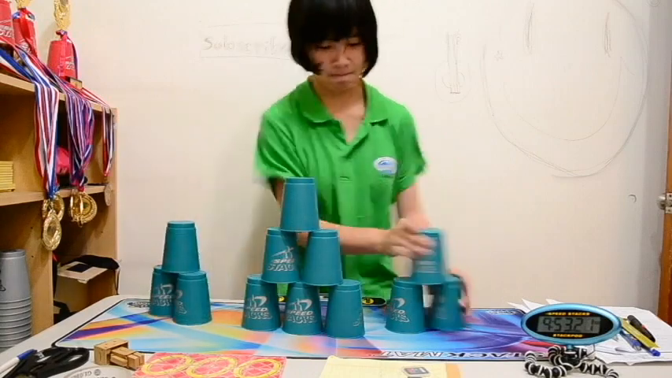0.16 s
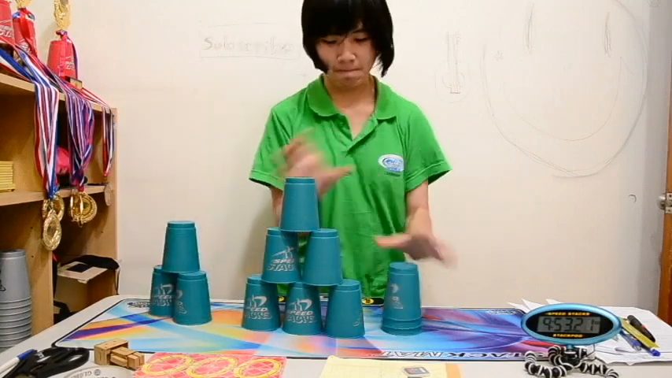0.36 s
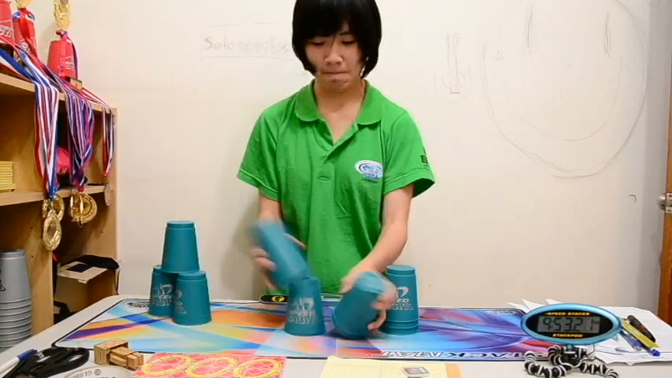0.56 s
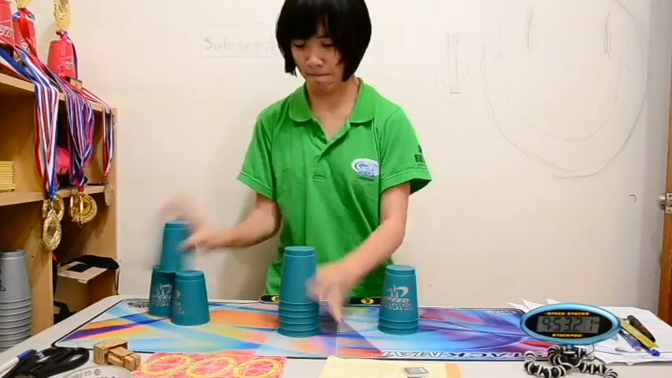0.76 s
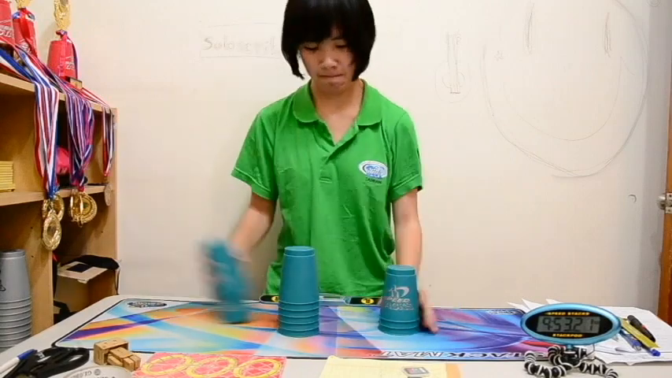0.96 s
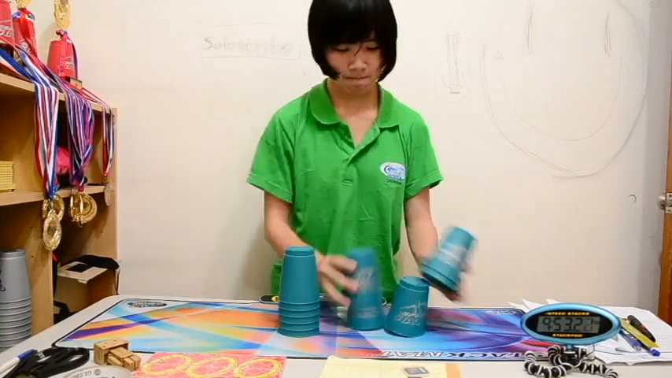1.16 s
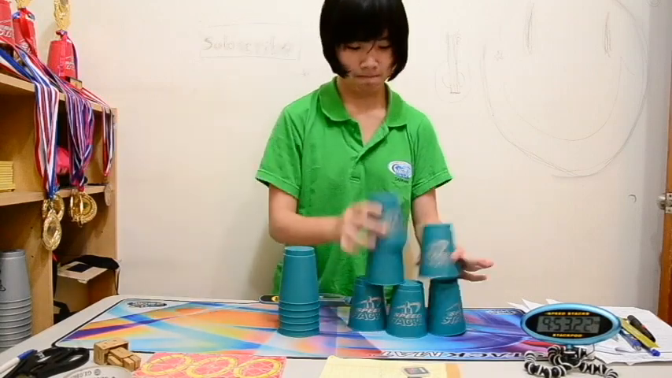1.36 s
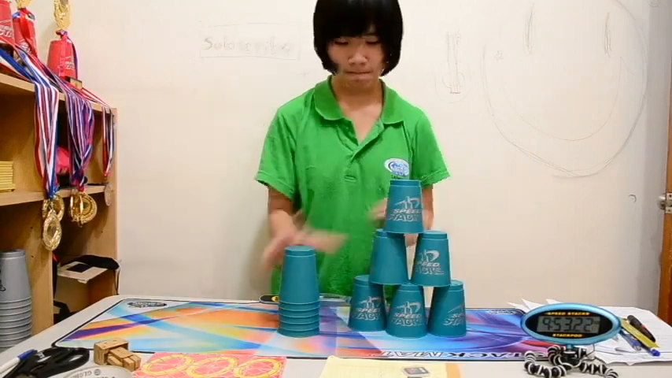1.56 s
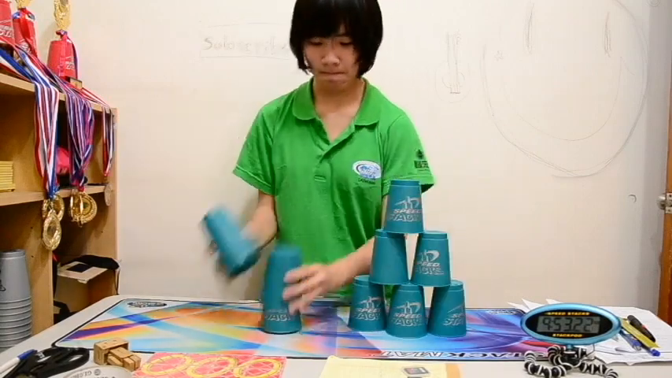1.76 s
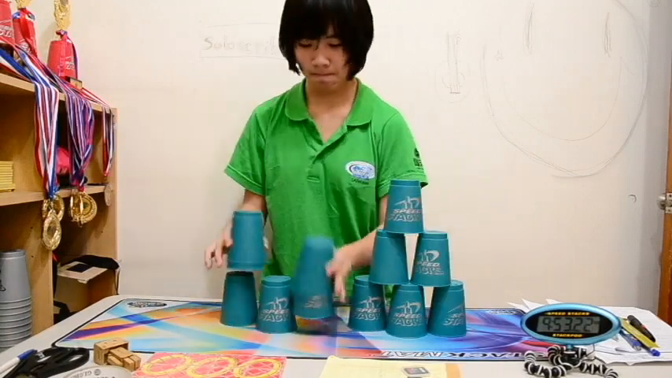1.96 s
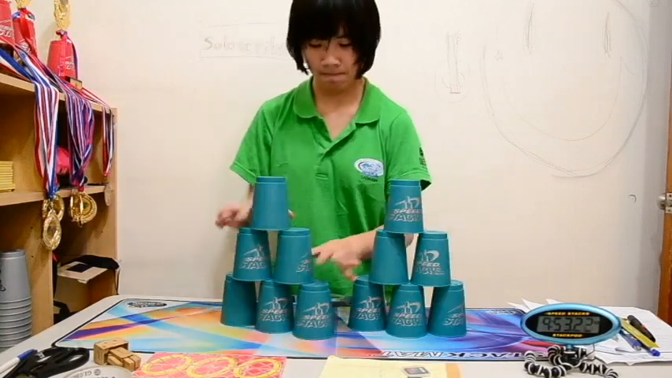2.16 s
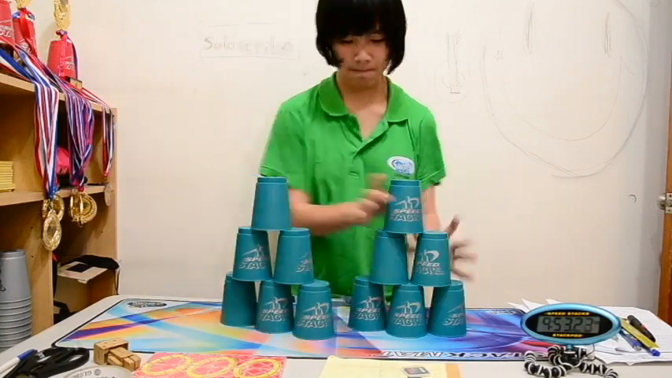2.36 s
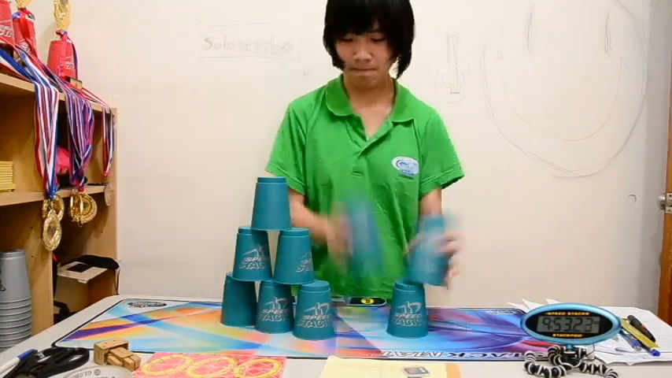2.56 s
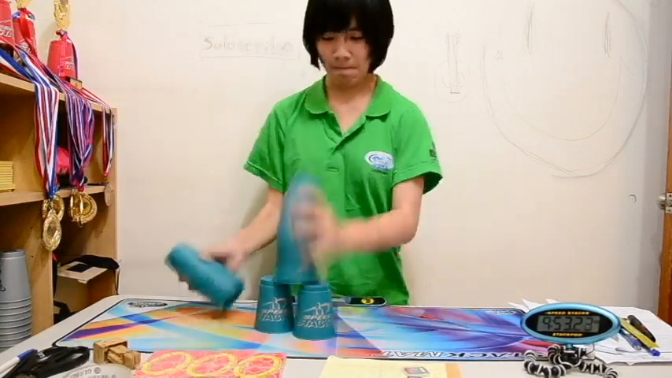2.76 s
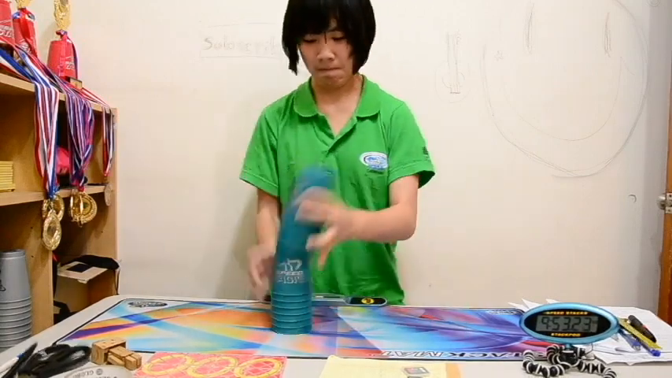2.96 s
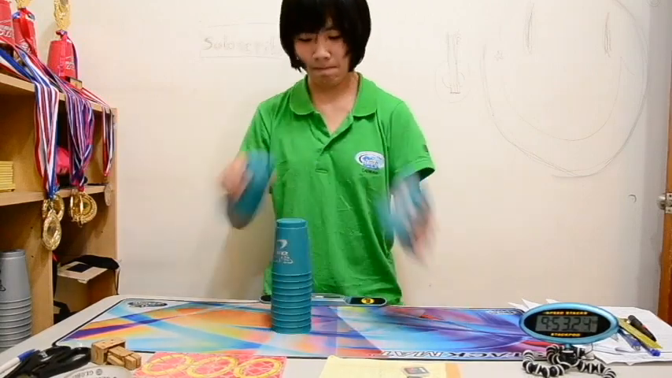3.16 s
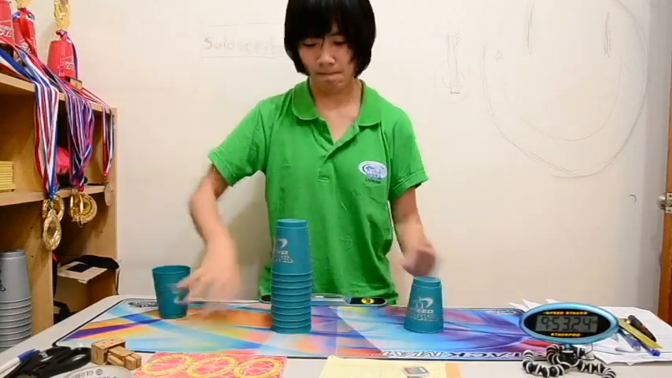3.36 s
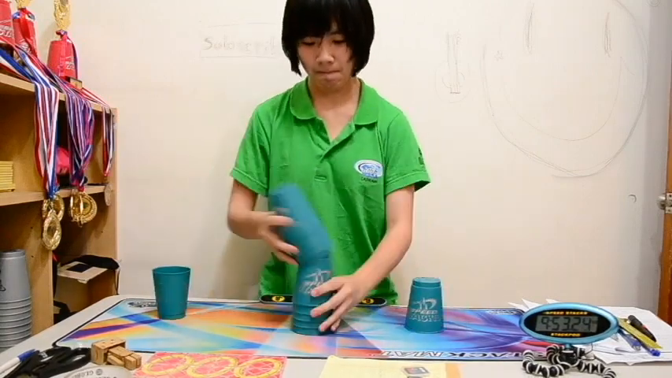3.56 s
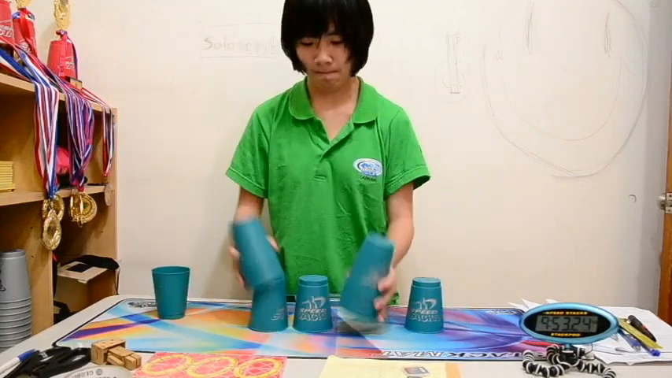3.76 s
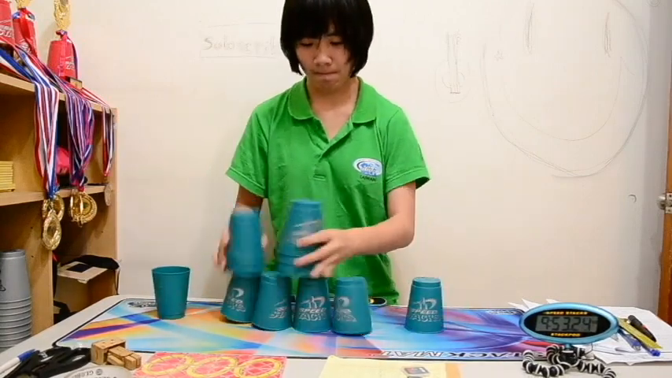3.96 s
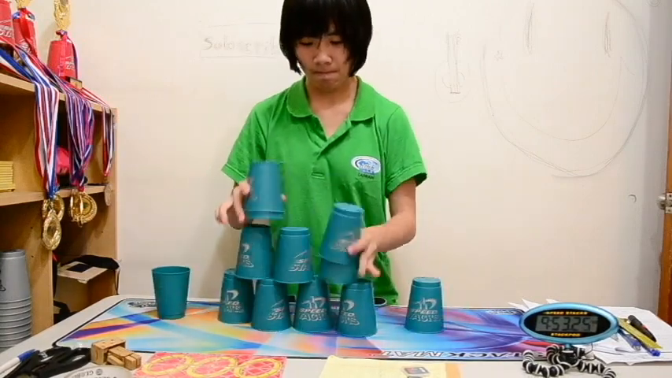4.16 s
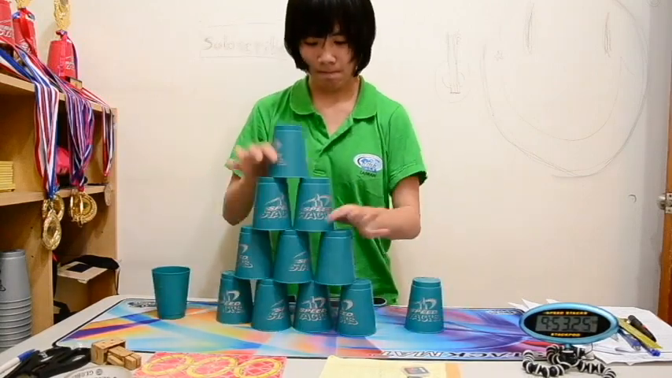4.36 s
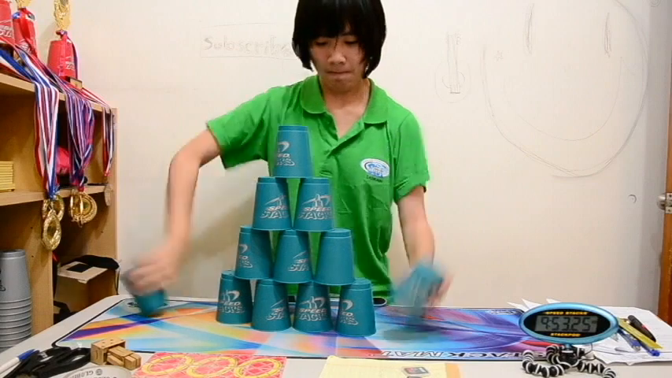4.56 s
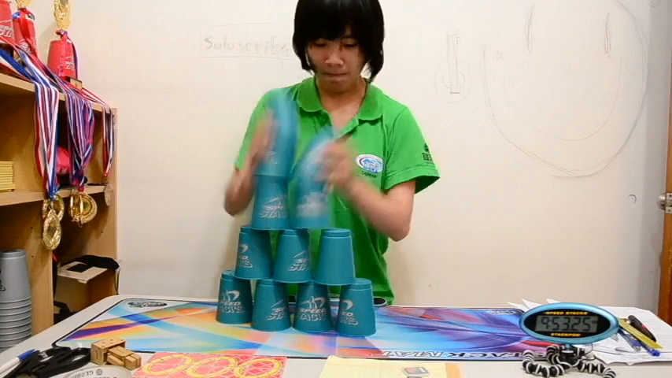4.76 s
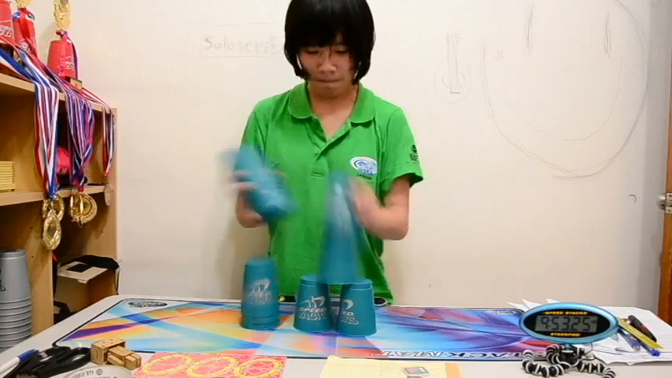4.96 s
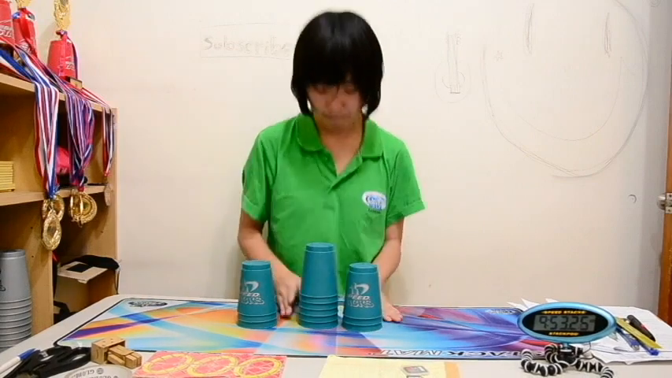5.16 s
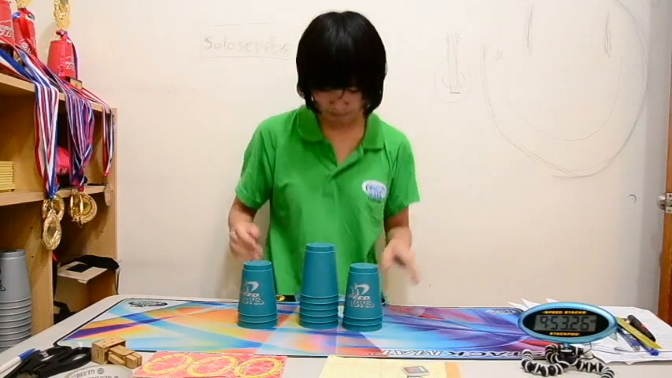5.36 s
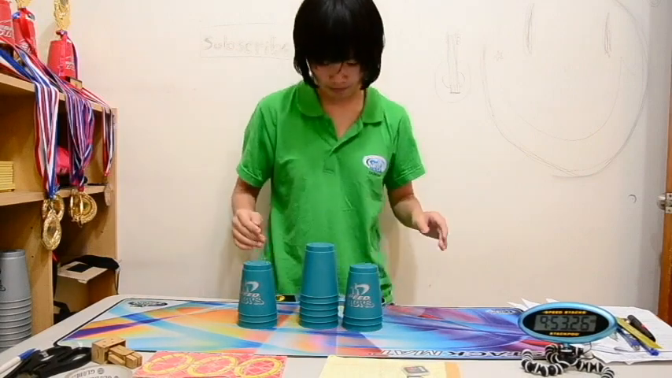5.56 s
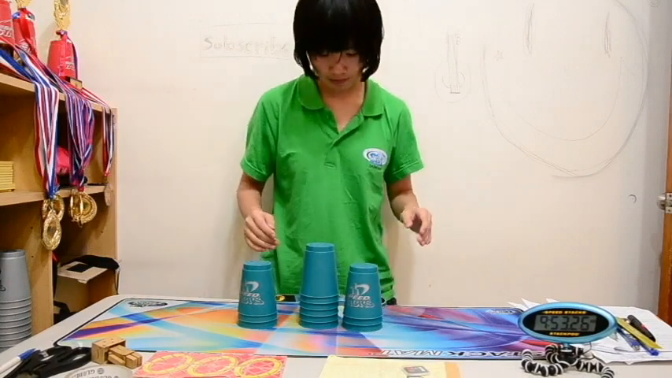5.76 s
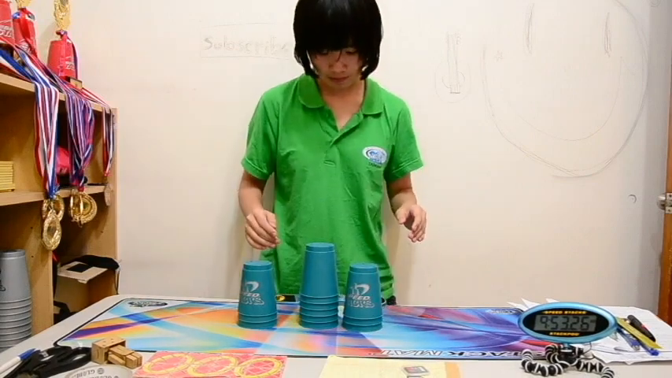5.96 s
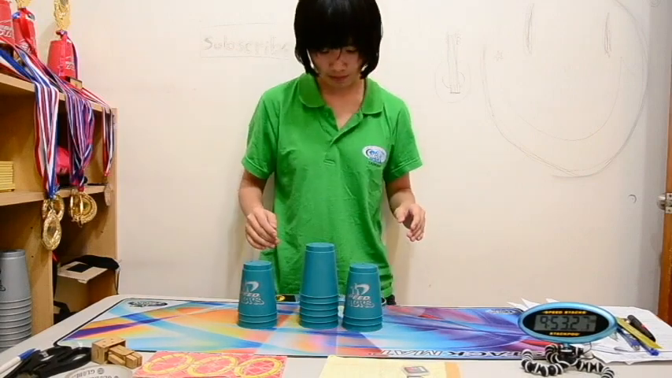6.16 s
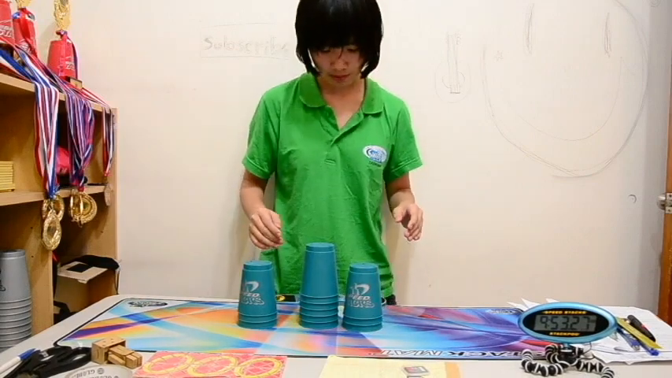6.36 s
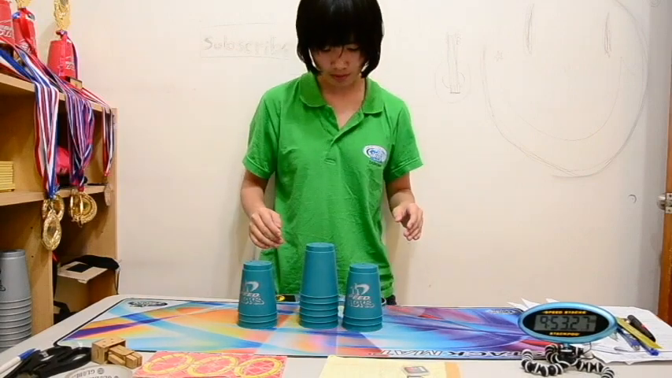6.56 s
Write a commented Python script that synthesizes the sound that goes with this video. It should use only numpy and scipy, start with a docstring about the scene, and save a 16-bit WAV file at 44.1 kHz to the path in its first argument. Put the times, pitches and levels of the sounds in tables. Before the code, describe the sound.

Light plastic cups are handled very fast on a table with a mat, heard from one spot in a small bare room with a short echo. A couple of hollow taps open, then until about 1.1 seconds cups slide into each other with rattles, small pops and loud clacks. From 1.3 to 2.2 seconds come quick runs of hollow taps and knocks as pyramids go up. From 2.4 to 3.1 seconds they are swept down in a dense, sliding clatter. Separate knocks on the mat and light pops follow between 3.3 and 3.8 seconds. Another rapid run of taps grows louder from 3.9 to 4.4 seconds. After a few softer knocks, the last collapse rattles and clacks from 4.8 seconds, ending with knocks at around 5.2. A very faint high ring accompanies the clatter. Only a soft room hush remains until the end, around 6.5 seconds.

```python
"""In a small bare room, light plastic cups are stacked fast into pyramids on a table with a mat,
then swept down into piles. Each hit thumps the table, knocks on the mat, rings the air in the cup
and its thin wall, and clicks at the rim. Cups rattle and pop as they slide into each other.
The room echoes over a soft hush, something rings faintly along, and the loudest peaks are squashed."""
import sys
import numpy as np
from scipy import signal
from scipy.fft import rfft, irfft, next_fast_len
from scipy.io import wavfile
from scipy.ndimage import uniform_filter1d

SR = 44100
rng = np.random.default_rng(int(sys.argv[2]) if len(sys.argv) > 2 else 0)


def store_pcm(level_fs):
    """Save levels as 16-bit WAV."""
    pcm = np.round(np.clip(level_fs, -1, 1) * 32767).astype(np.int16)
    wavfile.write(sys.argv[1], SR, np.atleast_2d(pcm).T)


N = 291041
HIT_TIME = np.arange(SR // 8) / SR  # seconds since a hit; every fade_s is the time to fall by 60 dB
FIRM_DB = -18.5  # a hit this strong has its usual snap; stronger ones sound cleaner


def amp(db):
    """Turn decibels into a number to multiply by."""
    return 10 ** (np.asarray(db) / 20)


def unit(x):
    """Scale a sound to an average strength (rms) of 1."""
    return x / np.sqrt(np.mean(x ** 2) + 1e-20)


def add(track, start_s, sound):
    """Mix a sound into the track."""
    start = max(round(start_s * SR), 0)
    track[start:start + len(sound)] += sound[:len(track) - start]


def along(points, hz):
    """Read between the rows of a (pitch_hz, value) table."""
    pitches, values = np.transpose(points)
    return np.interp(np.log(hz + 1), np.log(pitches + 1), values)


def causal(gain):
    """A filter with these gains that never sounds before it is hit (minimum phase)."""
    cepstrum = irfft(np.log(gain))
    half = len(gain) - 1
    cepstrum[1:half] *= 2
    cepstrum[half + 1:] = 0
    return np.exp(rfft(cepstrum))


def coloured(x, spectrum):
    """Shape a sound's lows and highs with a (pitch_hz, level_db) table."""
    hz = np.fft.rfftfreq(2048, 1 / SR)
    response = irfft(causal(amp(along(spectrum, hz))))
    return signal.fftconvolve(x, response)[:len(x)]


def ring(tones, detune, scatter_db, swell_s):
    """The fading tones of a struck thing; every hit tunes and weights them a little differently."""
    hz, db, fade_s = np.transpose(tones)[:, :, None]
    tuning, strength, side = rng.standard_normal((3, len(tones), 1))
    swing = np.sign(side) * np.sin(2 * np.pi * hz * np.exp(detune * tuning) * HIT_TIME)
    swing *= amp(db + scatter_db * strength - 60 * HIT_TIME / fade_s) * (1 - np.exp(-HIT_TIME / swell_s))
    return np.diff(np.sum(swing / hz, axis=0), prepend=0)  # sound follows the change of motion


def crack(fade_s):
    """So many tones at once that they blur into a burst of noise, even from low to high."""
    burst = rfft(rng.standard_normal(len(HIT_TIME)) * amp(-60 * HIT_TIME / fade_s))
    ripple = np.sqrt(np.abs(uniform_filter1d(np.abs(burst) ** 2, size=24)))
    return irfft(burst * causal(ripple.mean() / ripple), len(HIT_TIME))


# the lows and highs of the quiet room: pitch_hz, level_db
HUSH_COLOUR = [(25, -20), (60, -5), (100, -12), (200, -4), (500, -1.5), (1000, -3), (2000, -8.5),
               (3200, -12.5), (5000, -19.5), (7000, -23), (9500, -35.5), (12000, -45), (16000, -53)]
def room_hush(level_db):
    """The soft, steady noise of the room."""
    return amp(level_db) * unit(coloured(rng.standard_normal(N), HUSH_COLOUR))


# the tones of the table top: pitch_hz, level_db, fade_s
TABLE_TONES = [(66, -36.5, .08), (120, -7.5, 0.075), (189.2, -7.5, .035), (246.5, 5, 0.041),
               (300, 13, 0.025)]
def table_thump():
    """The table top shakes with a low thump."""
    return ring(TABLE_TONES, detune=0.04, scatter_db=-0.5, swell_s=0.0017)


# the tones of a cup pressed on the mat: pitch_hz, level_db, fade_s
KNOCK_TONES = [(395.4, -5.5, 0.019), (450.5, -4, 0.022), (565.5, -3.5, 0.044), (710, 2, 0.027)]
def mat_knock():
    """A cup gives a short knock against the mat."""
    return ring(KNOCK_TONES, detune=0.073, scatter_db=4.0, swell_s=0.0016)


def cup_air(hz, fade_s):
    """The hollow 'pok': air rings in the struck cup, and more weakly in the cups it touches."""
    own = ring([(hz, 0, fade_s)], detune=0.027, scatter_db=-2, swell_s=0.0012)
    neighbour_tones = [(739.0, 2.0, 0.01), (920.5, -6.5, 0.042), (1073.0, -2.5, 0.033)]
    return own + amp(-8) * ring(neighbour_tones, detune=.03, scatter_db=5, swell_s=0.0012)


# the lows and highs of a cup's wall: pitch_hz, level_db
WALL_COLOUR = [(200, -32), (900, -11), (1350, 0.5), (1650, 0), (2150, -1), (2700, -5.5), (3500, -10),
               (5000, -17), (10000, -42.5), (16000, -63.5)]
def cup_wall():
    """The thin wall's many tones die fast, in a dry clack."""
    return coloured(crack(fade_s=.016), WALL_COLOUR)


# a bright click, with the treble near 11 kHz filtered away: pitch_hz, level_db
CLICK_FILTER = [(100, -31), (400, -11.5), (1500, -6), (3500, 0.5), (5200, -0.5), (7000, -1.5), (7800, -7),
                (8600, -2.5), (10000, -7.5), (11300, -29), (14500, -22), (16500, -32.5)]
def rim_click(chatter_db, chatter_fade_s):
    """A sharp crack, then the rim chatters in tiny bounces."""
    bounces = unit(rng.standard_normal(len(HIT_TIME)) ** 5)
    chatter = bounces * amp(chatter_db - 60 * HIT_TIME / chatter_fade_s)
    return coloured(crack(fade_s=.011) + chatter, CLICK_FILTER)


# how long the room's echo lasts: pitch_hz, fade_s
ECHO_FADES = [(100, 0.47), (260, 0.41), (700, 0.29), (1800, 0.34), (4500, 0.32), (9000, 0.27), (15000, 0.2)]
def room_echo(snap_db, wall_db, wall_s, build_s):
    """Sound arrives straight from the cup, then off the wall behind, then from all around."""
    hz, t, noise = signal.stft(rng.standard_normal(SR // 2), SR, nperseg=256)
    tail = signal.istft(noise * amp(-60 * t / along(ECHO_FADES, hz)[:, None]), SR, nperseg=256)[1]
    firmness = amp(min(snap_db, 0))  # a soft brush swells slowly and melts into its echoes
    tail *= 1 - np.exp(-(np.arange(len(tail)) / SR * firmness / build_s) ** 2)
    echo = amp(5) * tail / np.linalg.norm(tail)
    echo[0] += amp(snap_db) * firmness ** 2
    dull = np.hanning(9)
    add(echo, wall_s * rng.uniform(.88, 1.0), amp(wall_db) * firmness * dull / dull.sum())
    return echo


def in_room(parts, snap_db):
    """Give the parts of a hit their echo, and make them start equally strong."""
    echo = room_echo(snap_db, wall_db=-4.0, wall_s=0.0085, build_s=0.0036)
    heard = signal.fftconvolve(parts, echo[None], axes=1)
    attack = round(.03 * SR)
    return heard / heard[:, :attack].std(axis=1, keepdims=True)


def hit(levels_db, air_hz, air_fade_s, snap_db):
    """One hit sounds five parts at once; high snap is a clean blow, low snap a soft brush."""
    parts = [table_thump(), mat_knock(), cup_air(air_hz, air_fade_s), cup_wall(),
             rim_click(chatter_db=-4.5 - snap_db, chatter_fade_s=0.042)]
    return amp(levels_db) @ in_room(parts, snap_db)


def part_levels(mix, db, support_db=0, air_db=0, wall_db=0, rim_db=0):
    """How loud the five parts are; the support is the table and mat together."""
    return np.add(mix, db) + [support_db, support_db, air_db, wall_db, rim_db]


# the parts of a cup being set down: table_db, mat_db, air_db, wall_db, rim_db
STACK_PARTS = (-25.5, -6.5, -1, -12.5, -19)
# cups set on a pyramid: start_s, level_db, edge_db, support_db, pitch_hz, second_touch_s
STACKED_CUPS = [(0.001, -26.5, 2, -0.5, 993, .027), (0.219, -12.5, -7, -8, 992, .036),
                (1.364, -23.5, 1.5, -3, 1015, .021), (1.433, -17.5, 2, 2.5, 943, .018),
                (1.489, -14, -2.5, -3, 988, .021), (1.914, -19, 4.5, 2, 792, .016),
                (2.063, -24, 2, 5, 994, .025), (2.121, -17.5, 4, 3.5, 1034, .029),
                (2.182, -14.5, -0.5, -2.5, 890, .02), (2.231, -35.5, -2.5, -7, 990, .037),
                (3.872, -20, -2, -4, 955, .02), (4.033, -18, 3.5, 3, 950, .027),
                (4.088, -24.5, -1.5, 0.5, 966, .03), (4.148, -23.5, -0.5, -2.5, 920, .031),
                (4.216, -17, 5.5, 3.5, 917, .013), (4.287, -19, -3.5, -2.5, 913, .019),
                (4.353, -13.5, -3.5, 0, 938, .011), (4.402, -12, -0.5, -10.5, 926, .021)]
def stacking():
    """A cup meets one support, tips onto the other and settles, each touch weaker and more hollow."""
    track = np.zeros(N)
    for start_s, db, edge_db, support_db, hz, rock_s in STACKED_CUPS:
        for touch, delay_s in enumerate([0, rock_s, 2.35 * rock_s]):
            touch_db = db - 3.5 * touch ** 2
            dulled_db = edge_db - 3.5 * touch
            levels = part_levels(STACK_PARTS, touch_db, support_db - touch,
                                 wall_db=dulled_db, rim_db=dulled_db)
            snap_db = 4.0 + 0.5 * (db - FIRM_DB) + 0.5 * touch
            add(track, start_s + delay_s, hit(levels, hz, air_fade_s=.024, snap_db=snap_db))
    return track


def faint_ring(cups, hz, fade_s, level_db):
    """Something small and hard nearby rings faintly along with the clatter."""
    t = np.arange(SR) / SR
    tone = np.sin(2 * np.pi * hz * t) * amp(-60 * t / fade_s)
    return signal.fftconvolve(cups, amp(level_db) * tone / np.linalg.norm(tone))[:N]


def soft_hits(rows, mix, air_hz, air_fade_s, snap_db):
    """Cushioned hits: the more the edge catches, the more wall and rim are heard."""
    track = np.zeros(N)
    for start_s, db, edge_db in rows:
        levels = part_levels(mix, db, wall_db=edge_db, rim_db=edge_db)
        add(track, start_s, hit(levels, air_hz, air_fade_s, snap_db + 0.23 * (db - FIRM_DB)))
    return track


# the parts of a brush: table_db, mat_db, air_db, wall_db, rim_db
BRUSH_PARTS = (-20, -11.5, -0.5, -19.5, -15.5)
# cups brushed in passing: start_s, level_db, edge_db
BRUSHED_CUPS = [(0.107, -55.5, 22.5), (0.184, -21.5, -6), (0.353, -35.5, 12), (0.424, -19, -3),
                (0.735, -26.5, 9.5), (1.218, -52, 16), (2.11, -25.5, 8), (2.428, -27.5, -1.5),
                (2.441, -21.5, -4.5), (2.461, -19.5, 9.5), (3.473, -43, 7.5), (3.987, -38.5, 10.5),
                (4.537, -34.5, -5), (4.622, -50, 7)]
def brushing():
    """A hand or another cup grazes a cup and rings the air inside."""
    return soft_hits(BRUSHED_CUPS, BRUSH_PARTS, air_hz=939, air_fade_s=0.039, snap_db=-0.5)


# the lows and highs of sliding plastic: pitch_hz, level_db
SLIDE_COLOUR = [(30, -29), (100, -19), (250, -4.5), (600, 4.5), (950, 4), (1300, 1.5), (2000, -4.5),
                (4000, -13), (7000, -19.5), (9500, -20.5), (11300, -40.5), (16000, -43)]
# cups sliding down over each other: start_s, length_s, level_db
SLIDING_CUPS = [(0.205, 0.018, -38), (0.394, 0.088, -33), (0.549, 0.056, -24.5), (0.64, 0.1, -25),
                (0.871, .04, -35), (2.439, 0.078, -22), (2.613, 0.045, -31.5), (2.757, 0.064, -20.5),
                (2.859, .11, -23.5), (3.966, .08, -36), (4.229, 0.05, -40.5), (4.795, 0.1, -24.5),
                (4.945, 0.088, -23.5), (5.061, 0.066, -28)]
def sliding(slips_per_s, spread_db, boost_db, fall_db_per_s):
    """Cups catch and slip in a rattle that swells with speed and fades once they sit tight."""
    slips = (rng.random(N) < slips_per_s / SR) * rng.standard_normal(N)
    slips *= amp(spread_db * rng.standard_normal(N))
    t = np.arange(N) / SR
    force = np.zeros(N)
    for start_s, length_s, db in SLIDING_CUPS:
        swell = np.clip((t - start_s) / length_s, 0, 1) ** 1.5
        force += swell * amp(db - fall_db_per_s * np.maximum(t - start_s - length_s, 0))
    rattle = unit(coloured(slips, SLIDE_COLOUR)) * amp(boost_db) * force
    echo = room_echo(snap_db=1.5, wall_db=-6.5, wall_s=0.013, build_s=.005)
    return signal.fftconvolve(rattle, echo / np.linalg.norm(echo))[:N]


# the parts of a cup hitting a cup: table_db, mat_db, air_db, wall_db, rim_db
PILE_PARTS = (-21.5, -4, -1.5, -1, -7)
def pile_hits(rows, air_hz, air_fade_s, snap_db):
    """Cups strike wall to wall; the rim and the weight of the pile join in."""
    track = np.zeros(N)
    for start_s, db, edge_db, weight_db in rows:
        levels = part_levels(PILE_PARTS, db, support_db=weight_db, air_db=weight_db, rim_db=edge_db)
        add(track, start_s, hit(levels, air_hz, air_fade_s, snap_db))
    return track


# cups dropping into each other: start_s, level_db, edge_db, weight_db
CLACKING_CUPS = [(0.256, -36.5, 15, 2), (0.304, -33, 0, 1.5), (0.372, -30, 1, -1.5), (0.447, -23, 5, 0.5),
                 (0.461, -27, 8, -3), (0.475, -15, -5.5, -12.5), (0.508, -27.5, -3.5, 9.5),
                 (0.557, -33.5, 10, 7.5), (0.657, -20.5, -2.5, 2), (0.779, -25.5, -8.5, -2),
                 (0.834, -23.5, 9, -1.5), (0.959, -24, 6, 4.5), (1.075, -37.5, 2.5, 2),
                 (2.512, -16.5, 1, -2.5), (2.554, -27, -5, 1.5), (2.608, -27.5, 9.5, 12),
                 (2.628, -17.5, -5.5, -6.5), (2.715, -22.5, 5, 5), (2.737, -23.5, 6.5, 4.5),
                 (2.757, -17.5, 0.5, -5), (2.782, -21, -1, 5), (2.842, -33, 5, 8), (2.955, -27, -3.5, 0),
                 (2.987, -22, -5.5, -1), (3.0, -24.5, -3.5, -2), (3.022, -24, -2, -13),
                 (3.058, -22.5, -4, 6), (3.317, -24, -10, -1), (3.51, -30.5, -2.5, -3.5),
                 (3.582, -33.5, -2.5, 5.5), (4.782, -22.5, 6, 8), (4.808, -21, 4.5, -5.5),
                 (4.823, -25, 0, 7.5), (4.843, -16.5, -0.5, -7), (4.867, -17, -4, -2),
                 (5.08, -21.5, -1.5, 1), (5.101, -24.5, -4.5, 1.5)]
def clacking():
    """A cup clacks against the next as it joins a pile."""
    return pile_hits(CLACKING_CUPS, air_hz=897, air_fade_s=.02, snap_db=2.5)


# cups popping into or out of a pile: start_s, level_db, pitch_hz
POPPING_CUPS = [(.304, -28.5, 1860), (.508, -21.5, 1500), (0.599, -21.5, 1940), (0.857, -21, 2030),
                (1.076, -31.5, 1510), (1.913, -26.5, 1950), (3.51, -30.5, 1720), (3.583, -36, 1720),
                (3.765, -32, 2950), (4.867, -28, 2150), (5.101, -21.5, 1543)]
def popping(fade_s, glide, boost_db):
    """The thin layer of air between two cups rings briefly as they part or meet."""
    track = np.zeros(N)
    loudness = amp(-60 * HIT_TIME / fade_s) * (1 - np.exp(-HIT_TIME / 0.00059))
    for start_s, db, hz in POPPING_CUPS:
        # the gap changes as the cups move, so the pitch slides
        pitch = hz * (1 + glide * (np.exp(-HIT_TIME / (fade_s / 8)) - .5))
        pop = np.sin(2 * np.pi * np.cumsum(pitch) / SR) * loudness
        add(track, start_s, amp(db + boost_db) * in_room([pop], snap_db=5.5)[0])
    return track


# whole piles pushed together: start_s, level_db, edge_db, weight_db
SLAMMED_PILES = [(0.597, -19, 2.5, -9), (0.756, -12.5, -6.5, -1), (0.855, -16, 3.5, -12.5),
                 (2.826, -20.5, -1.5, -3.5), (2.942, -23.5, -2, -1), (5.0, -22.5, 1.5, 9.5)]
def slamming():
    """A pile slams shut in one clean blow."""
    return pile_hits(SLAMMED_PILES, air_hz=950, air_fade_s=0.012, snap_db=8.0)


# the parts of a landing: table_db, mat_db, air_db, wall_db, rim_db
LANDING_PARTS = (-11, 0, -6.5, -9, -14)
# cups coming down on the mat: start_s, level_db, edge_db
LANDING_CUPS = [(0.803, -20, -6), (0.979, -22.5, -10), (1.288, -33.5, -0.5), (1.307, -29.5, 3.5),
                (1.663, -42.5, 5), (1.713, -36, 7), (1.727, -28, -3.5), (1.876, -32.5, -7.5),
                (1.897, -33.5, 5.5), (3.102, -30.5, 4), (3.293, -17, -12.5), (3.309, -19, -6.5),
                (3.346, -34, -3.5), (3.53, -33.5, 0), (3.743, -37.5, -1.5), (3.764, -22.5, 1.5),
                (3.783, -32, -2.5), (3.857, -31, -6.5), (3.933, -36.5, 7.5), (4.572, -35.5, 3),
                (4.592, -32, 4.5), (5.027, -26.5, 8), (5.155, -26.5, 0.5), (5.19, -28.5, -2.5)]
def landing():
    """A cup knocks down on the mat, where its air rings only very briefly."""
    return soft_hits(LANDING_CUPS, LANDING_PARTS, air_hz=820, air_fade_s=0.0077, snap_db=4)


def scene():
    """The cups and the room, heard from one spot."""
    cups = stacking() + clacking() + slamming() + landing() + brushing()
    cups += popping(fade_s=0.021, glide=.25, boost_db=2.0)
    cups += sliding(slips_per_s=300, spread_db=3.5, boost_db=5, fall_db_per_s=189)
    ringing = faint_ring(cups, hz=4065, fade_s=.65, level_db=-38.5)
    return (cups + ringing + room_hush(level_db=-63.5))[None]


def record(dry):
    """Squash the loudest peaks and cut off the very highest treble."""
    ceiling, hardness, top_hz = .74, 9, 16650
    squashed = dry / (1 + np.abs(dry / ceiling) ** hardness) ** (1 / hardness)
    size = next_fast_len(N + SR // 2)
    passes = np.fft.rfftfreq(size, 1 / SR) < top_hz
    return irfft(rfft(squashed, size) * passes, size)[:, :N]


dry = scene()
out = record(dry)
store_pcm(out)
```